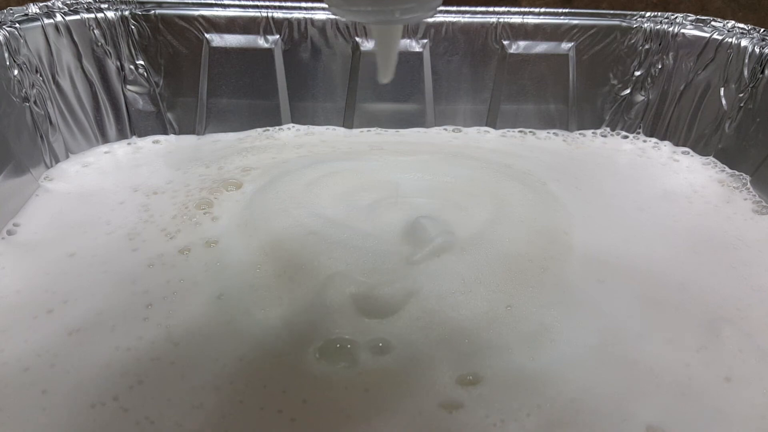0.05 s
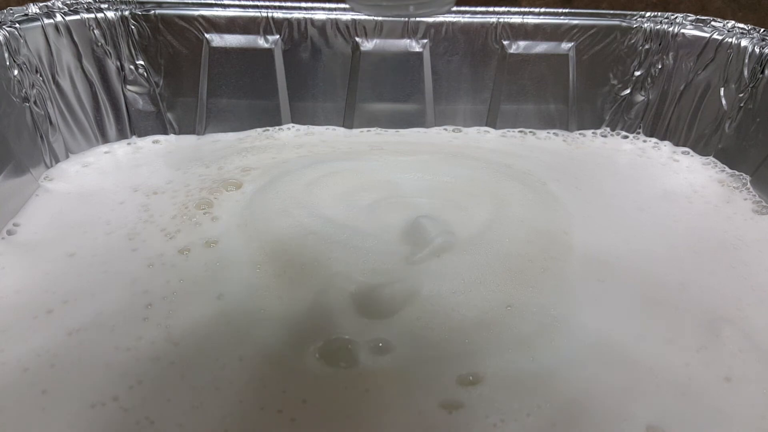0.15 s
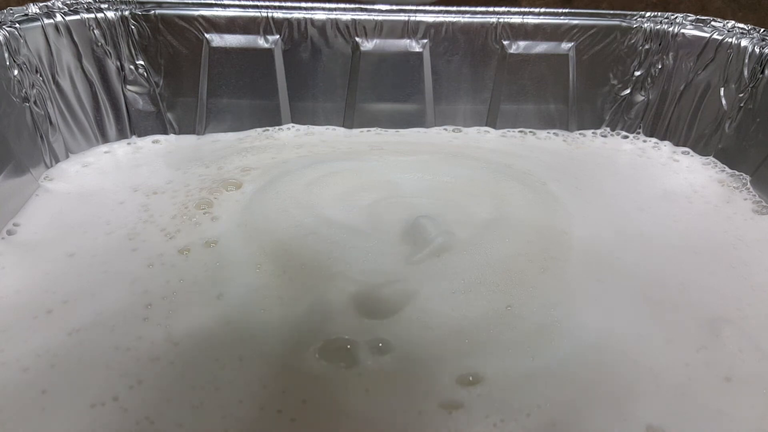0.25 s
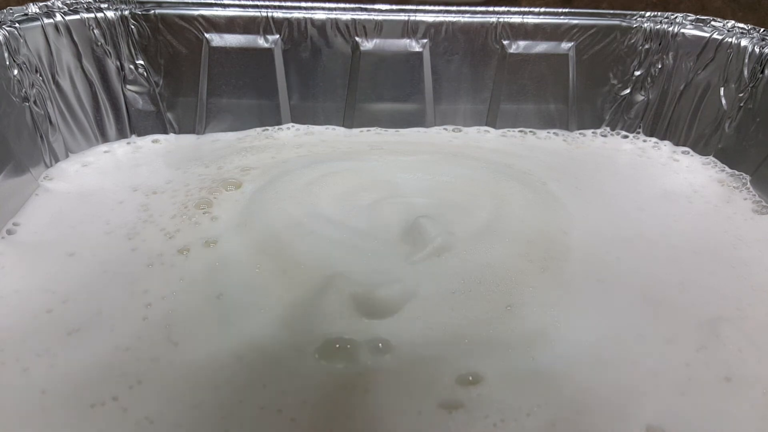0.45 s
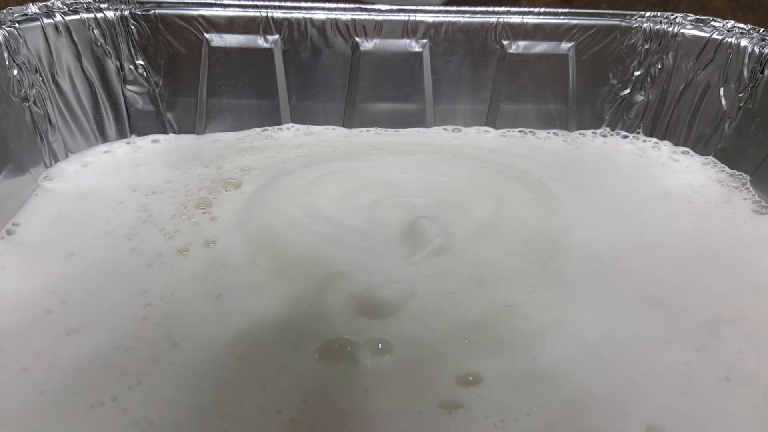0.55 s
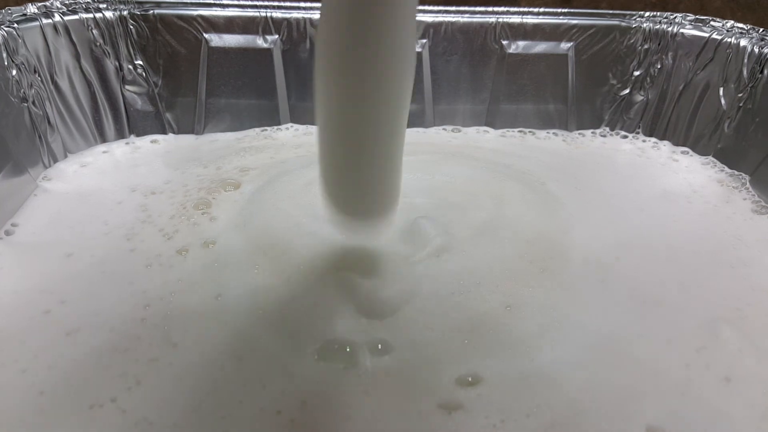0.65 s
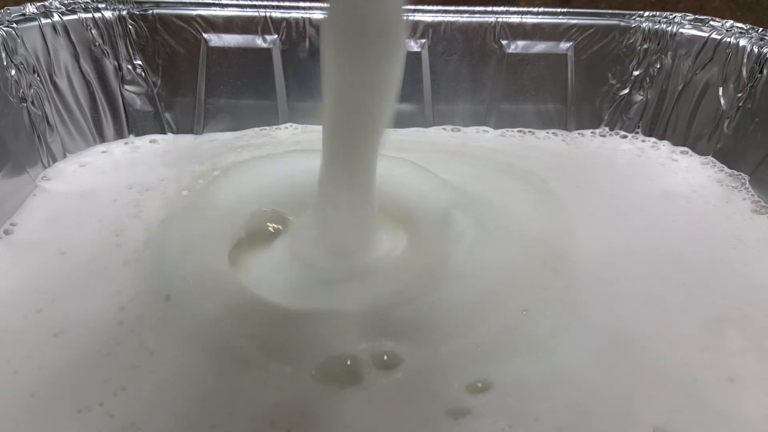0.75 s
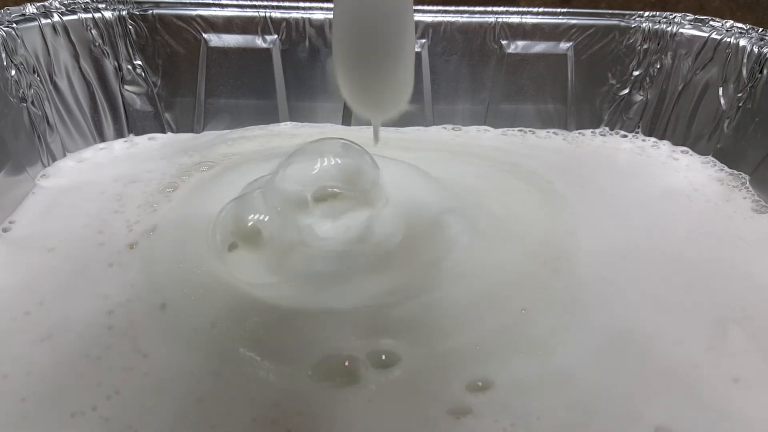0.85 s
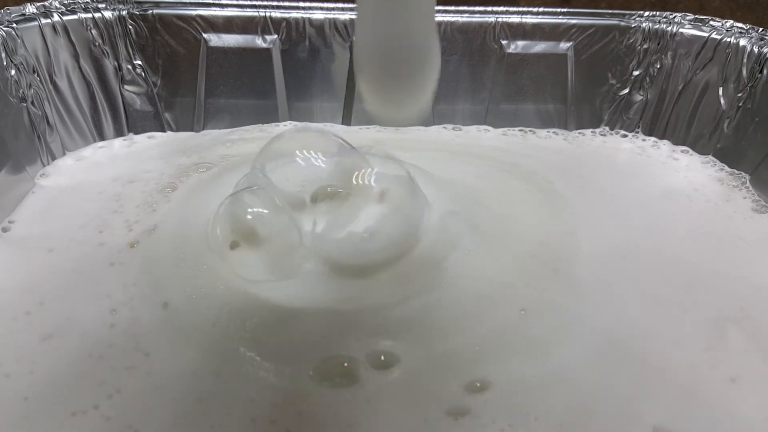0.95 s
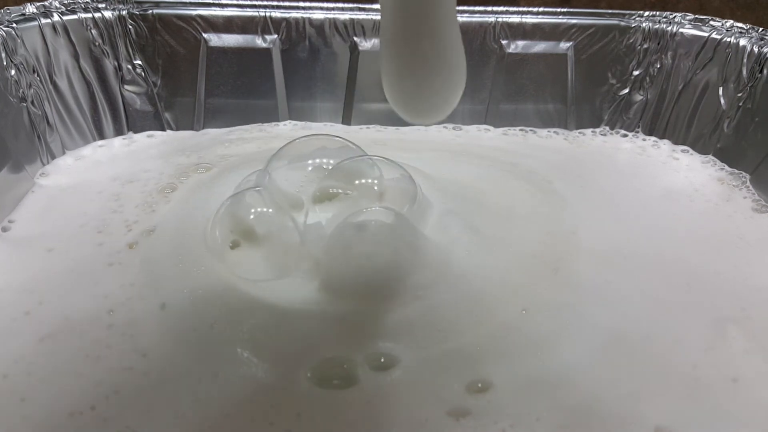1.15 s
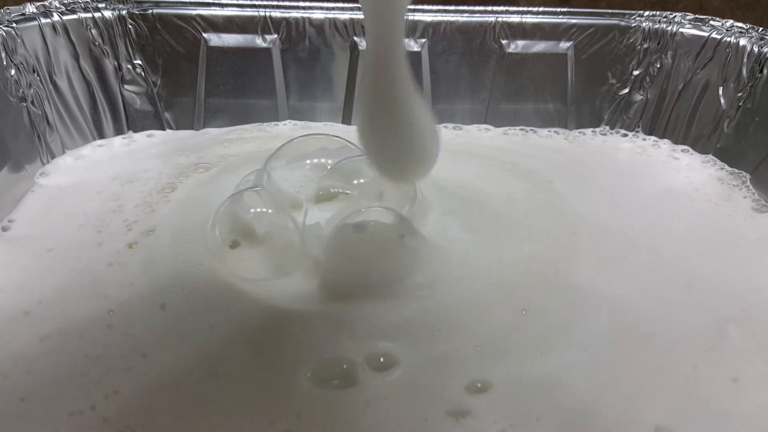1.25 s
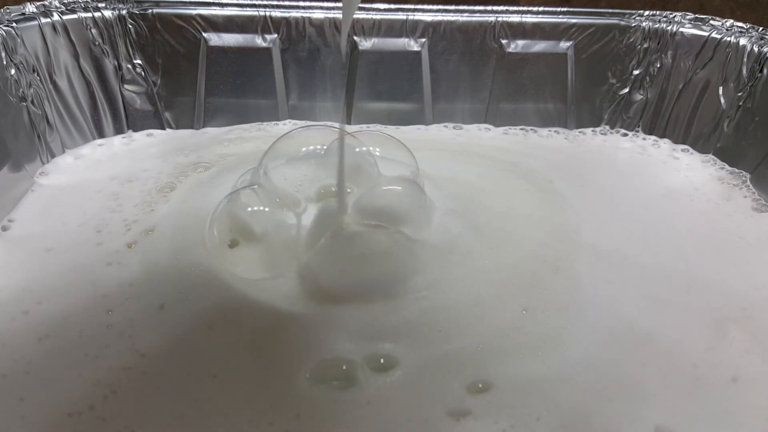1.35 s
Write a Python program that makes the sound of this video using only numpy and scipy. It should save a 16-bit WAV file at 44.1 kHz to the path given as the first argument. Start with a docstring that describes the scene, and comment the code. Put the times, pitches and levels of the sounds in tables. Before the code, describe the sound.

A squeeze bottle nozzle spits and pops as liquid and air spurt out, close up.

```python
"""Squeeze bottle sputtering over foam

Close up in a small hard room, in stereo: thick liquid and trapped air leave a nozzle over a foil tray.
Air pockets burst with a short hollow pop and a spit of spray, first singly, then in runs, and gulps
of liquid thud below them. The foam in the tray fizzes softly, the tray rings faintly, the room answers."""
import sys
import numpy as np
from scipy import signal
from scipy.fft import rfft, irfft, next_fast_len
from scipy.io import wavfile
from scipy.ndimage import uniform_filter1d

SR = 44100
rng = np.random.default_rng(int(sys.argv[2]) if len(sys.argv) > 2 else 0)


def output_pcm(signal):
    """Save a mono or channel-first signal as 16-bit PCM at the path in sys.argv[1].

    Samples are clipped to [-1, 1] before scaling.
    """
    pcm = np.clip(np.atleast_2d(signal).T, -1, 1) * 32767
    wavfile.write(sys.argv[1], SR, np.round(pcm).astype(np.int16))


N = 61739
T = np.arange(N) / SR
BIN_HZ = np.arange(N // 2 + 1) * SR / N
POP_ATTACK_S, POP_LOW_CUT_HZ = 0.00029, 930   # small sources radiate little bass


def pops():
    """Each air pocket bursting at the nozzle rings its cavity for a few cycles and spits spray."""
    # t/s, cavity f/Hz, cycles to fall to 1/e, pop level/dB, spray level/dB, spray roll-off f/Hz,
    # left minus right/dB
    pockets = [(0.1711, 2070, 0.83, -36.5, -44, 11900, 0), (0.2252, 2100, 1.57, -7.5, -9.5, 15800, 1),
               (0.3754, 1210, 0.58, -17.5, -68, 5000, 1), (.4310, 1833, 1.93, -5.5, -11.5, 13000, -0.5),
               (.4895, 1995, 0.64, -9.5, -49, 6000, 4.5), (.5490, 2600, 0.69, -12.5, -12, 15200, -8),
               (.5505, 1920, 1, -29, -19, 14200, -3.5), (0.5519, 1466, 1.1, 0.5, -15.5, 6000, -1.5),
               (0.594, 4100, 1.84, -0.5, -17.5, 7000, 1), (0.5954, 1950, 2, -10, -14, 7030, 5),
               (0.6606, 1710, 1.3, 3, -15, 5030, 1.5), (0.669, 1730, 1.05, -1, -12, 16000, -2.5),
               (0.6776, 2030, 0.84, -25, -24, 14000, -20), (0.6974, 2120, 1.06, -7.5, -10, 5150, -2),
               (0.7232, 1620, 0.8, -8.5, -21.5, 6000, 9), (0.727, 2140, 0.67, -2, -9, 11900, 0.5),
               (.7510, 1590, 1.8, -6, -14, 8200, 2), (.7710, 2160, 0.45, -2, -27, 4980, -13.5),
               (0.808, 2550, 0.78, -26, -32.5, 15300, -28), (0.8179, 1595, 1.96, -8, -45, 8000, 1),
               (0.818, 1920, 0.33, -2, -14.5, 16000, 3), (0.8225, 1730, 2.1, -10, -23, 12260, -4.5),
               (0.8245, 1716, 2.2, -19, -30, 16100, 7), (0.897, 1790, 0.72, 1, -29, 9000, 2.5),
               (0.8996, 1650, 3.3, -16, -12, 16400, -4.5), (0.9052, 2330, 0.75, -1.5, -13, 13900, -2.5),
               (0.9122, 1714, 4.5, -10, -24, 12200, 2.5), (0.9325, 1960, 0.49, -1, -12.5, 8000, 4.5),
               (0.9593, 1783, 4.2, -9.5, -20, 7100, 4), (0.96, 1760, 3.9, -16, -20.5, 11900, -6),
               (0.9706, 1600, 1.25, -8.5, -24, 7000, 6), (.9953, 1860, 1.08, 4.5, -29, 4000, -0.5),
               (0.995, 2670, 1.35, 3, -25, 4040, 3), (1.0076, 2680, 0.66, -9, -13.5, 15200, 0.5),
               (1.0160, 2200, 1, -9, -25.5, 8600, 9), (1.0393, 1655, 2.8, -25.5, -45, 5050, -10),
               (1.102, 1065, 0.7, -14, -57, 4000, 2.5), (1.1201, 1340, 0.58, -11, -39, 4040, 0),
               (1.186, 2340, 1.2, -45, -39, 12000, -1), (1.2220, 2810, 0.33, -5, -27.5, 9000, 0)]
    pitch_rise, overtone_ratio, overtone_db = 0.013, 1.49, -11
    out = np.zeros((2, N))
    hiss = spray()
    for onset, hz, cycles, pop_db, spray_db, top_hz, pan_db in pockets:
        span, t = after(onset)
        decay_s = cycles / hz
        phase = 2 * np.pi * hz * t * (1 + pitch_rise * (np.tanh(t / decay_s) - 1))
        cavity = np.sin(phase) + from_db(overtone_db) * np.sin(overtone_ratio * phase)
        ring = cut(cavity * burst(t, POP_ATTACK_S, decay_s), POP_LOW_CUT_HZ, "high", order=4)
        spatter = cut(spit(hiss[:, span], t), top_hz, "low", order=1)
        pan = from_db([[pan_db / 2], [-pan_db / 2]])
        out[:, span] += pan * (from_db(pop_db) * ring + from_db(spray_db) * spatter)
    return out


def spray():
    """The grainy hiss of spray, wide across the microphones."""
    # spray spectrum: f/Hz, relative level/dB
    colour = [(300, -15), (1000, 4), (2700, 6), (4000, 0.5), (6000, 1), (7400, -2.5), (8600, 5.5),
              (10000, -7.5), (14500, -6), (17000, -40)]
    grain_db = 7
    mid, side = noise(colour)
    flicker = unit_power(uniform_filter1d(rng.standard_normal(N), size=8))
    return from_db(grain_db * np.clip(flicker, -2, 2)) * stereo(mid, side, likeness=0.22)


def spit(hiss, t):
    """One sharp spit of spray, with fine droplets crackling on after it."""
    jet_s, droplets_s, droplets_db = 0.0011, 0.0061, -19.5
    jet = burst(t, attack_s=0.0001, decay_s=jet_s)
    flow = jet + from_db(droplets_db) * burst(t, jet_s, droplets_s)
    flow_rms = np.sqrt(np.mean(flow ** 2))
    return cut(unit_power(hiss * flow) * flow_rms, 320, "high")


def gulps():
    """Liquid and air swing low in the bottle, so heavily damped that they thud."""
    # gulps of liquid: t/s, f/Hz, level/dB
    thuds = [(0.219, 213, -27), (.2260, 377, -26.5), (0.3753, 279, -20.5), (0.4319, 385, -22.5),
             (.3910, 283, -39), (.4945, 156, -31.5), (.5522, 614, -25), (.5530, 326, -18.5),
             (0.5552, 140, -20), (0.5963, 313, -27), (.6620, 318, -20), (.6700, 305, -18.5),
             (0.6973, 226, -20), (0.7195, 224, -15.5), (.7280, 356, -13.5), (.7275, 1026, -5.5),
             (0.733, 123, -22), (.7760, 127, -27.5), (0.819, 184, -33), (.9000, 288, -21),
             (0.9131, 228.5, -18.5), (.9600, 513, -20), (0.9706, 376, -19.5), (.9830, 580, -18.5),
             (1.007, 397, -29), (1.0410, 542, -18.5), (1.0640, 580, -27), (1.0970, 570, -18.5),
             (1.1080, 560, -20.5), (1.1215, 281, -21)]
    out = np.zeros(N)
    for onset, hz, db in thuds:
        span, t = after(onset)
        out[span] += from_db(db) * np.sin(2 * np.pi * hz * t) * burst(t, attack_s=0.0006, decay_s=1 / hz)
    return cut(out, 94, "high", order=3)


def foam():
    """Tiny bubbles break at random all over the stirred foam, each ringing for a few cycles."""
    # loudness of the fizz: t/s, level/dB
    fizz_level = [(0, -77.5), (.12, -72.5), (.2, -69), (.25, -44.5), (.37, -76), (.46, -47), (.54, -80),
                  (.75, -40.5), (.87, -56), (1.03, -55), (1.18, -47), (1.39, -63.5)]
    bubbles_per_s, decay_cycles, spread_db = 1000, 0.83, 2
    pitches_hz = np.geomspace(972, 5200, num=14)
    out, t = np.zeros((2, N)), T[:SR // 50]
    for hz in pitches_hz:
        breaks = rng.random((2, N)) < bubbles_per_s / (2 * len(pitches_hz) * SR)
        strengths = from_db(spread_db * np.minimum(rng.exponential(1, (2, N)), 4))
        ring = np.sin(2 * np.pi * hz * t) * burst(t, POP_ATTACK_S, decay_cycles / hz)
        out += signal.fftconvolve(breaks * strengths, ring[None], axes=1)[:, :N]
    fizz = unit_power(cut(out, POP_LOW_CUT_HZ, "high"))
    return from_db(np.interp(T, *np.transpose(fizz_level))) * fizz


def tray(bottle):
    """The filled foil tray under the nozzle rings on after each thud."""
    # low modes of the tray: f/Hz, relative level/dB, t60/s
    modes = [(120.5, -44, 0.17), (202, -42, 0.69), (270.7, -55, 0.39), (345.3, -51.5, 0.93),
             (470, -49, 0.1), (558, -46.5, 0.82)]
    ring = sum(from_db(db - 60 * T / t60) * np.sin(2 * np.pi * hz * T) for hz, db, t60 in modes)
    return signal.fftconvolve(bottle, ring)[:N] / 10


def echoes(bottle):
    """Tray and counter reflect the bottle, reaching each microphone at a slightly different time."""
    # first reflections: left delay/s, right delay/s, level/dB
    reflections = [(.0009, .0014, -41.5), (.0026, 0.0023, -16), (.0085, .0091, -23)]
    return sum(from_db(db) * np.array([delayed(bottle[0], left), delayed(bottle[1], right)])
               for left, right, db in reflections)


def room(bottle):
    """Hard walls return a diffuse tail that dies band by band, wide in the treble, narrow in the bass."""
    # reverberation: f/Hz, level/dB, t60/s, left-right likeness (0 to 1)
    bands = [(103, -5, 0.82, 0.97), (280, -4.5, 0.46, 0.93), (620, 0.5, 0.48, 0.73),
             (1410, -13.5, 0.69, 0.012), (2600, -5.5, 0.31, 0), (4500, -7.5, 0.55, 0),
             (8700, -9.5, 0.38, 0.25), (15000, -6.5, 0.2, 0)]
    onset_s, build_s = 0.0022, 0.0017
    white, tail = rfft(rng.standard_normal((2, N))), 0
    edges_hz = np.geomspace(40, 20480, 19)
    for low, high in zip(edges_hz, edges_hz[1:]):
        centre = np.sqrt(low * high)
        db, t60, likeness = (at_hz(bands, centre, column) for column in (1, 2, 3))
        mid, side = irfft(white * ((BIN_HZ >= low) & (BIN_HZ < high)), N)
        fade = from_db(db - 60 * T / t60)
        fade *= np.sqrt(np.log(1000) / (t60 * SR))   # same energy however long the tail
        tail += fade * stereo(mid, side, likeness)
    tail *= 1 - np.exp(-np.maximum(T - onset_s, 0) / build_s)
    return signal.fftconvolve(bottle, tail, axes=1)[:, :N]


def room_tone():
    """Faint steady indoor air, mostly bass and near the centre."""
    # spectrum of the air: f/Hz, relative level/dB
    colour = [(25, 1), (45, 0), (65, 13.5), (95, -10), (125, 5.5), (210, 2), (300, -2.5), (600, -6.5),
              (1100, -16), (1800, -16), (4000, -23), (9000, -26.5), (16000, -25)]
    level_db, side_db = -67, -8
    mid, side = noise(colour)
    return from_db(level_db) * (mid + from_db(side_db) * side * [[1], [-1]])


def from_db(db):
    """Decibels to gain."""
    return 10 ** (np.asarray(db) / 20)


def unit_power(x):
    """Scale to an RMS of one."""
    return x / np.sqrt(np.mean(x ** 2) + 1e-20)


def at_hz(table, hz, column=1):
    """Read one column of a table along log frequency."""
    table = np.array(table)
    return np.interp(np.log(np.maximum(hz, 1)), np.log(table[:, 0]), table[:, column])


def noise(colour):
    """Two unrelated channels of coloured noise, unit power."""
    white = rfft(rng.standard_normal((2, N)))
    return unit_power(irfft(white * from_db(at_hz(colour, BIN_HZ)), N))


def stereo(mid, side, likeness):
    """Mid and side noise to left and right, correlated by the given likeness."""
    return np.sqrt(1 + likeness) * mid + np.sqrt(1 - likeness) * side * [[1], [-1]]


def burst(t, attack_s, decay_s):
    """Quick rise and exponential fall."""
    return (1 - np.exp(-t / attack_s)) * np.exp(-t / decay_s)


def after(onset):
    """The tenth of a second after an onset: its samples and its elapsed time."""
    span = slice(int(onset * SR), int(onset * SR) + SR // 10)
    return span, np.maximum(T[span] - onset, 0)


def delayed(x, delay_s):
    """The same sound arriving later, to a fraction of a sample."""
    size = next_fast_len(N + SR // 10)
    hz = np.arange(size // 2 + 1) * SR / size
    return irfft(rfft(x, size) * np.exp(-2j * np.pi * hz * delay_s), size)[:N]


def cut(x, hz, kind, order=2):
    """Butterworth high- or low-pass."""
    return signal.sosfilt(signal.butter(order, min(hz, .45 * SR), kind, fs=SR, output="sos"), x + 1e-18)


def scene():
    """The bottle close to the microphones, slightly to the left, with tray and room around it."""
    bottle = pops() + gulps()
    direct = np.array([bottle[0], delayed(bottle[1], delay_s=0.00007)])
    return direct + echoes(bottle) + tray(bottle.mean(0)) + room(bottle) + foam() + room_tone()


def record(dry):
    """The recorder clips at full scale and shuts out the treble above 18 kHz."""
    low_pass = signal.cheby2(12, 70, 18000, fs=SR, output="sos")
    return signal.sosfilt(low_pass, np.clip(dry, -1, 1))


dry = scene()
out = record(dry)
output_pcm(out)
```